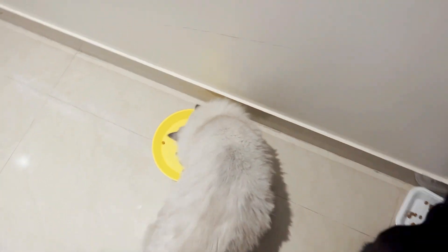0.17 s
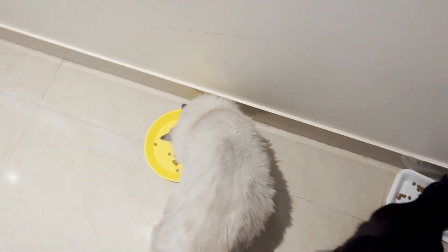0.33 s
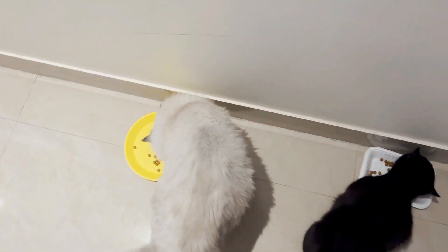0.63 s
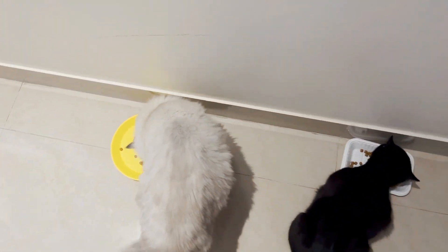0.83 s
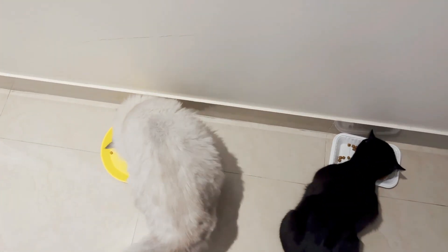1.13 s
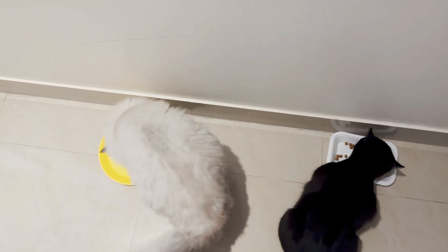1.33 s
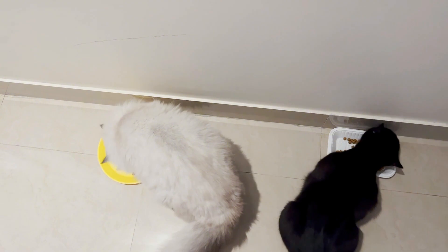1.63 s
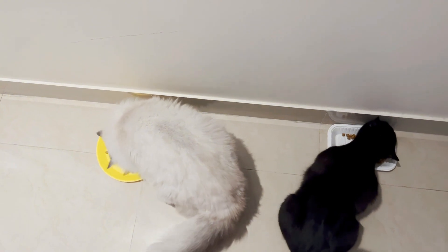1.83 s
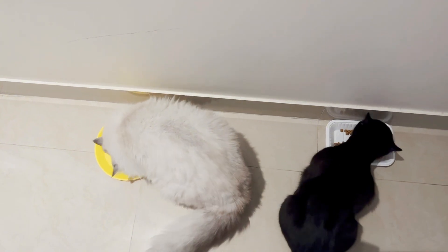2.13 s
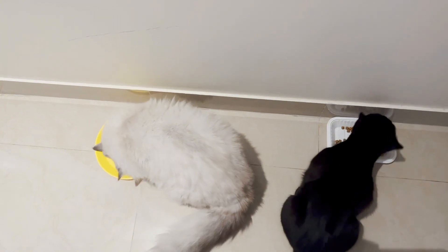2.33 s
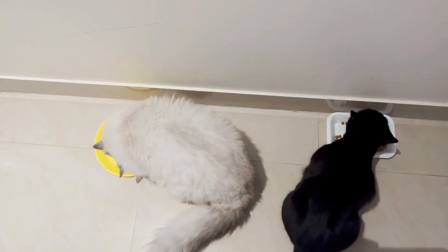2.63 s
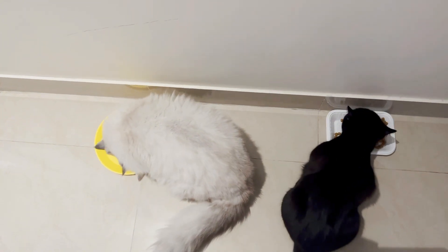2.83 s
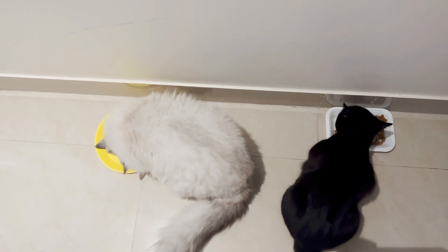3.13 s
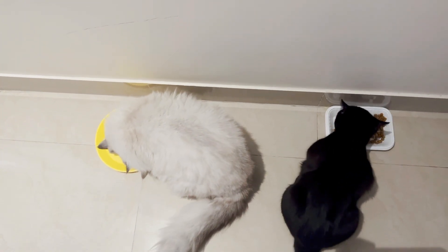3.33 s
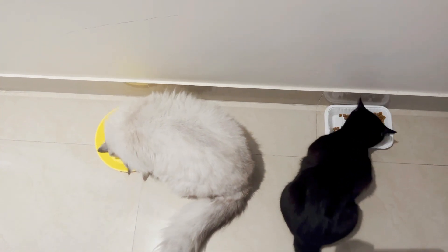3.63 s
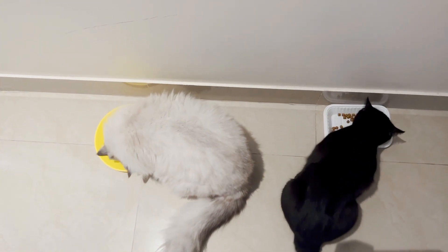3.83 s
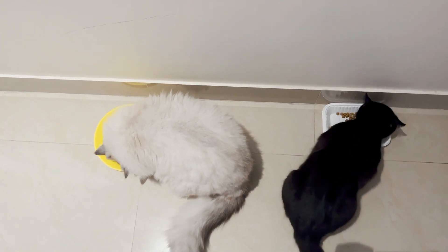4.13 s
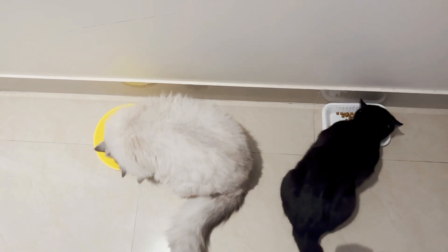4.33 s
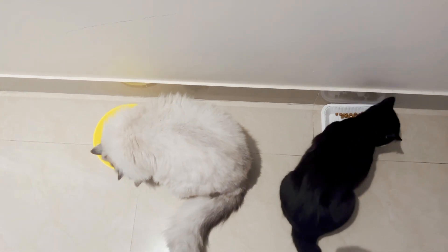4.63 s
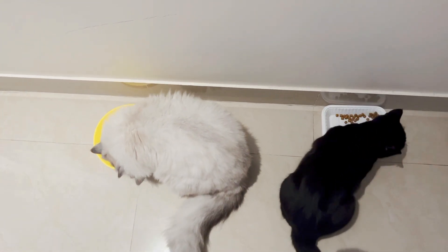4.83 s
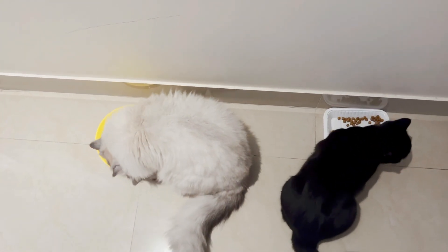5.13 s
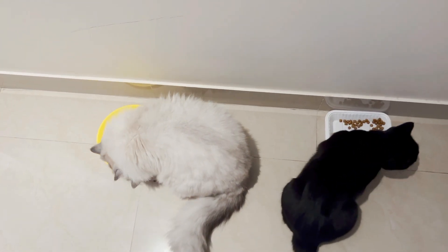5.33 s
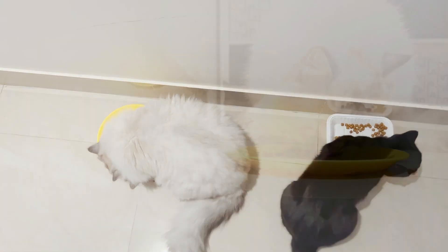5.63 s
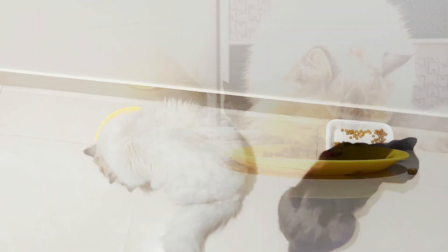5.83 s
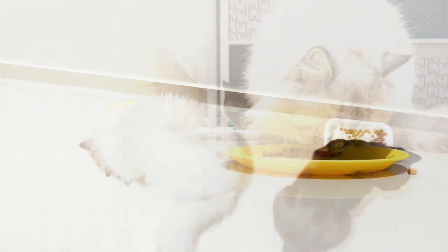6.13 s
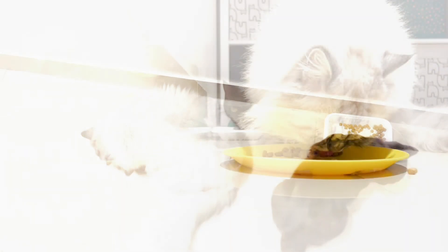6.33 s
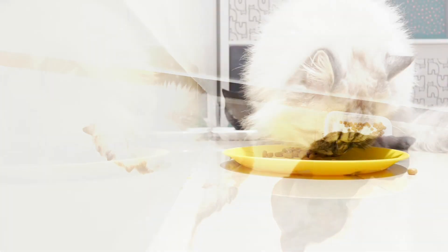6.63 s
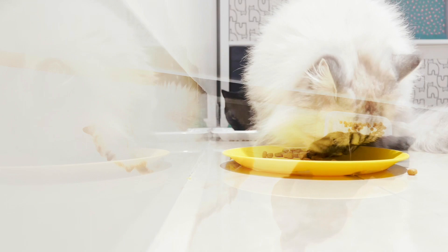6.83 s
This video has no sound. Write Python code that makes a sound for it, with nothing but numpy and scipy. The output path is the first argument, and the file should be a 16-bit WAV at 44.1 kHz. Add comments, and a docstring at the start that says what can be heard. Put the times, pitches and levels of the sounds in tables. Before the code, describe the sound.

Indoors on hard tiles, cats eat dry food from plastic dishes. Brittle cracks and gritty grinding open, then pellets tap the plate; after two seconds a quiet gap holds only faint wet mouth ticks. Crunching returns, ending with louder cracks, plate knocks and a growing rush of air. A low pulsing motor hum runs throughout. Close stereo microphone, slight room reflection.

```python
"""Teeth crack dry kibble and grind its crumbs: two cats eat from plastic dishes on tiles, beside a wall.
Cracks are short rings with noise splinters; grinding and sliding are grains over noise, shaped by strokes.
Pellets and dishes knock as decaying modes, with wet mouth ticks and faint falling ticks among them.
Dish, tiles and wall answer close to the two microphone ports, and the room answers the sharp sounds.
Behind, two motors beat in a low hum to the right, and the air rush grows louder near the end."""
import sys
import numpy as np
from scipy import signal
from scipy.fft import rfft, irfft
from scipy.io import wavfile

SR = 44100
rng = np.random.default_rng(int(sys.argv[2]) if len(sys.argv) > 2 else 0)


def log_audio(samples):
    """Write samples as a 16-bit WAV file to the path given in sys.argv[1]."""
    # one column per channel
    frames = np.atleast_2d(samples).T
    # limit to full scale, then quantise
    limited = np.clip(frames, -1, 1)
    pcm = np.round(limited * 32767).astype(np.int16)
    wavfile.write(sys.argv[1], SR, pcm)


N = 307818

# Pellets breaking between the teeth. Each row: start in seconds, relative peak in dB, ring in Hz, rise in s.
CRACKS = [(0.108, -40.5, 3560, .0005), (0.198, -40, 3900, .0006), (0.214, -37, 3860, .0007),
          (0.238, -31, 3460, 0.001), (0.3153, -43, 3950, 0.00053), (0.342, -31, 3970, 0.00034),
          (0.496, -35, 3660, .0006), (0.5391, -38.5, 3760, 0.00071), (0.5983, -26, 3970, 0.00043),
          (0.6264, -23, 3530, 0.00082), (0.6417, -35, 2580, 0.00057), (0.722, -52, 4060, .0005),
          (1.0987, -44.5, 2430, 0.00047), (1.33, -30, 2850, 0.00088), (1.331, -37, 2110, 0.00064),
          (1.3392, -40, 1680, .0006), (1.3485, -45, 2890, .0005), (1.374, -36, 4000, .0006),
          (1.3815, -33, 3520, 0.00064), (1.409, -36, 3666, .0004), (1.414, -41, 3870, .0005),
          (1.421, -41, 4100, 0.00045), (1.4283, -36, 3700, 0.0004), (1.5286, -35, 2500, 0.00041),
          (1.6624, -36, 3670, 0.00086), (1.685, -33, 1760, 0.00072), (1.687, -39, 3660, 0.00078),
          (1.7165, -39, 1600, .0006), (1.762, -37, 2700, 0.00056), (1.786, -44, 3900, .0005),
          (1.801, -38, 2550, 0.00077), (1.861, -42, 2300, 0.00055), (3.1735, -46, 2300, 0.00063),
          (3.2454, -48, 2310, .0007), (3.2798, -41, 2440, 0.0012), (3.6583, -39, 2340, 0.00035),
          (3.6715, -38, 2510, 0.00055), (3.8278, -44, 3730, 0.00046), (3.8446, -34.5, 2720, 0.00057),
          (3.913, -41, 2330, .0006), (3.931, -32, 2400, 0.0008), (3.947, -30, 2640, 0.00028),
          (3.955, -33, 2300, 0.00054), (3.9755, -32.5, 3164, 0.00051), (4.218, -33, 2650, 0.00049),
          (4.2677, -35, 3730, 0.00047), (4.2819, -37, 2830, .0005), (4.3493, -27, 3170, .0005),
          (4.397, -40, 3000, .0004), (4.6808, -30, 3150, 0.00077), (4.744, -46, 3060, 0.00043),
          (4.7577, -38, 2910, 0.00038), (4.8231, -29.5, 2600, 0.00062), (4.8249, -37, 3900, 0.0004),
          (4.8364, -50, 3110, 0.00041), (4.8514, -56, 2390, .0005), (4.9043, -48, 2510, 0.00052),
          (5.3668, -47.5, 2370, .0006), (5.3743, -46, 2350, 0.00084), (5.4117, -43, 3130, 0.00065),
          (5.4232, -39, 2600, 0.00049), (5.4577, -38, 3170, .0005), (5.4655, -40, 2420, 0.00053),
          (5.4978, -38, 2800, 0.00025), (5.5118, -34.5, 3530, 0.00055), (5.539, -42, 3300, 0.00059),
          (5.5707, -42, 3230, .0005), (5.5813, -36, 2970, 0.00041), (5.599, -49, 3460, .0005),
          (5.811, -32.5, 3170, 0.00041), (5.9469, -29.5, 2710, 0.00087), (6.0382, -38, 2900, 0.00053),
          (6.0417, -31, 2754, 0.00055), (6.0831, -31, 2480, 0.00032), (6.1224, -31.5, 3300, 0.00042),
          (6.132, -31, 2860, 0.001), (6.176, -33.5, 2830, 0.0005), (6.24, -21.5, 2900, 0.00062),
          (6.3159, -29, 2950, 0.00029), (6.6325, -48, 3600, .0006), (6.673, -38, 3650, 0.0007),
          (6.832, -36, 2880, 0.00035)]
# Jaw closing and grinding. Each row: start in seconds, length in s, relative level in dB, mouth resonance in Hz.
CHEWS = [(0.0, 0.19, -62.5, 3870), (0.193, 0.034, -57, 3930), (0.345, 0.021, -50, 3730),
         (0.391, 0.034, -54, 3170), (0.474, 0.03, -50.5, 3120), (0.641, 0.013, -51, 3126),
         (0.675, 0.021, -65, 2400), (0.715, 0.2, -68, 3380), (1.384, 0.02, -55, 3740),
         (1.41, 0.019, -52, 3900), (1.473, 0.029, -59.5, 3300), (1.514, 0.031, -54, 2880),
         (1.616, 0.059, -54.5, 3060), (1.692, 0.05, -56, 2000), (1.75, 0.062, -54, 2820),
         (1.845, 0.12, -62.5, 2340), (2.006, 0.033, -63, 2350), (3.188, 0.085, -77, 2320),
         (3.277, 0.012, -69.5, 2270), (3.564, 0.23, -69, 2350), (3.603, 0.098, -61, 2344),
         (3.841, 0.02, -54.5, 2690), (3.894, 0.027, -57.5, 2500), (3.929, 0.04, -46.5, 2880),
         (4.095, 0.12, -58, 3130), (4.214, 0.034, -50, 3135), (4.266, 0.019, -46, 3350),
         (4.338, 0.029, -60, 3100), (4.44, 0.073, -63.5, 2960), (4.735, 0.12, -64, 2930),
         (4.923, 0.062, -69, 3970), (5.373, 0.021, -60, 2660), (5.424, 0.018, -49, 3350),
         (5.455, 0.089, -54.5, 2900), (5.552, 0.028, -59, 2900), (5.595, 0.029, -69, 2780),
         (5.81, 0.023, -52, 3140), (5.9, 0.102, -62, 2900), (6.071, .008, -53, 2600),
         (6.124, 0.013, -50.5, 3200), (6.266, 0.12, -59, 3350), (6.384, 0.018, -55, 3340),
         (6.445, 0.0068, -59, 2280), (6.52, 0.0075, -55, 2270), (6.764, 0.0059, -54.5, 2210),
         (6.827, 0.17, -72, 2015)]
# Lesser fragments break at random within each chew; their peak is given above the chew's level.
FRAGMENTS_PER_S, FRAGMENT_DB, FRAGMENT_RISE_S = 45, 11, 0.0005
# Muzzle pushing loose pellets across the dish. Each row: start in seconds, length in s,
# relative level of the dish rustle in dB, relative level of the dry scraping in dB.
SHOVES = [(0.0, 0.37, -63.5, -69), (0.179, 0.067, -62, -62), (0.346, 0.024, -53.5, -57.5),
          (0.402, 0.15, -58, -61.5), (0.597, 0.004, -60, -54.5), (0.628, 0.022, -53.5, -54),
          (0.704, 0.17, -69, -77), (1.382, 0.069, -60.5, -60.5), (1.47, 0.064, -60.5, -63.5),
          (1.593, 0.081, -62.5, -63.5), (1.669, 0.11, -55, -66.5), (1.746, 0.06, -53, -62),
          (1.825, 0.1, -62, -72.5), (3.234, 0.82, -72, -100), (3.94, 0.086, -67, -66),
          (4.105, 0.16, -64, -69.5), (4.226, 0.081, -58.5, -64), (4.32, 0.04, -66, -72),
          (4.463, 0.043, -63, -74), (4.628, 0.076, -59.5, -72.5), (4.927, 0.06, -83, -79),
          (5.415, 0.13, -87, -69), (5.816, 0.043, -77, -64), (5.905, 0.21, -69, -70.5),
          (6.123, 0.025, -63, -65), (6.236, 0.046, -83, -58), (6.3, 0.096, -72, -64.5),
          (6.442, 0.014, -61, -56), (6.52, 0.014, -55, -62), (6.672, 0.03, -59, -53.5),
          (6.753, 0.18, -62, -87)]
# Colours of the three kinds of friction. Each row: frequency in Hz, density in dB per Hz.
GRIND = [(700, -10), (1300, 4), (1750, 0.5), (2150, 1.5), (2550, 3), (3300, -2.5), (4300, -1.5), (5300, -7),
         (6500, -13.5), (9000, -22)]
RUSTLE = [(100, -26), (180, 5.5), (300, 8.5), (500, -2), (850, 7.5), (1400, -0.5), (1900, 1.5), (3000, -45)]
SCRAPE = [(3500, -4), (5500, 0.5), (7000, 0.5), (8500, -4), (9300, -31), (10200, -22), (11000, -3),
          (12300, -4), (13500, -6.5), (14500, -21), (15500, -21)]
# A stroke swells (the jaw slowly, a shove faster, a jolt at once), sags, stops, and lingers faintly.
CHEW_SWELL_DB_PER_S, SHOVE_SWELL_DB_PER_S, JOLT_SWELL_DB_PER_S = 604, 1000, 5002
SAG_DB_PER_S, RELEASE_DB_PER_S = 6.5, 411
LINGER_DB, LINGER_DB_PER_S = -6.5, 133
# A tapped pellet jostles its neighbours: length of the jolt, and levels against the tap.
JOSTLE_S, JOSTLE_GRIND_DB, JOSTLE_SCRAPE_DB, JOSTLE_RUSTLE_DB = 0.0049, -26.5, -30.5, -29
# Pellets knocking on the plate. Each row: start in seconds, relative peak in dB,
# relative brightness in dB, upper edge of the ring in Hz.
TAPS = [(0.288, -37, -11, 5400), (0.517, -32, -24, 5500), (0.8966, -36.5, -22, 5400),
        (0.903, -37, -30, 4520), (0.9464, -35, -31, 4600), (0.961, -38, -31, 4800),
        (0.9905, -36, -31, 5850), (0.995, -48.5, -30, 4000), (1.753, -38.5, -19, 4990),
        (2.078, -34.5, -32, 3640), (2.0815, -39, -35, 2900), (2.15, -37.5, -40, 5160),
        (4.1065, -34, -33, 4500), (4.6276, -33, -29, 3640), (4.6808, -38.5, -27, 6400),
        (4.9348, -42.5, -18, 5500), (6.056, -34, 18, 5500), (6.443, -35, -8, 6500), (6.448, -32, -15, 6480),
        (6.456, -34, -19, 6000), (6.528, -38, 15, 5500), (6.618, -27, -7, 4770), (6.6599, -21.5, -18, 5130),
        (6.6621, -30, -10, 5000), (6.69, -41, -4, 5460), (6.832, -47, -43, 5950), (6.882, -49, -32, 5500)]
# Bright modes of plate and pellet. Each row: nominal frequency in Hz, mean level in dB, 60 dB decay in s.
PLATE = [(1023, -12.5, 0.02), (1600, -21, 0.036), (2400, -1, 0.013), (2970, -39, 0.014),
         (3480, 5.5, 0.0086), (3670, -24, 0.03), (4820, 4.5, 0.021), (5240, -17.5, 0.079),
         (7330, 4.5, .016), (8700, -15, 0.0098), (12200, 12, 0.011), (13900, -19, .006)]
# Dish knocked against the tiles. Each row: start in seconds, relative thud in dB,
# relative rim ring in dB, nominal pitch of the rim in Hz.
KNOCKS = [(0.636, -60, -54, 1560), (1.758, -48, -61, 1570), (4.245, -41, -45, 1500), (4.29, -49, -51, 1510),
          (6.448, -52, -48, 2210), (6.457, -58, -42.5, 2060), (6.518, -43, -47, 1546),
          (6.529, -49, -45, 1570), (6.6189, -41.5, -38.5, 1550), (6.661, -44, -38, 1620),
          (6.689, -44, -51, 1550), (6.765, -53, -48, 1550), (6.77, -47, -45, 1580),
          (6.8315, -57, -47, 1136), (6.576, -46, -60, 1550), (6.752, -50, -62, 1550),
          (6.803, -52, -66, 1550), (6.88, -49, -62, 1130), (6.935, -51, -62, 1130)]
# Low modes of the dish. Each row: nominal frequency in Hz, mean level in dB, 60 dB decay in s.
PLATE_BODY = [(327, 10, 0.016), (490, 4.5, 0.018), (786, -3, 0.035), (1013, -12.5, 0.05)]
# Modes of the rim. Each row: multiple of the rim's pitch, mean level in dB, 60 dB decay in s.
RIM = [(1, -4.5, 0.045), (1.2, -5, 0.042), (1.375, -0.5, 0.041), (1.72, -14, .03)]
# Narrow resonances of the dish. Each row: frequency in Hz, width in Hz, level in dB.
DISH_RING = [(1050, 26, -1.5), (1260, 42, -8.5), (1510, 27, -9), (1766, 40, 1), (2190, 17, -4),
             (2490, 42, -12), (3284, 50, 1), (3580, 14, -12), (4560, 30, -2), (5060, 12, -4),
             (5300, 36, -12), (5700, 25, -12)]
# Small wet mouth ticks. Each row: middle of the rise in seconds, relative level in dB, ring in Hz,
# rise in s, sharpness (no unit).
SMACKS = [(1.295, -59.5, 2750, 0.0031, 7), (2.295, -67, 4340, .0025, 5), (2.325, -63, 3423, 0.0026, 4),
          (2.344, -59, 2560, .003, 6), (2.432, -70, 4500, .005, 25), (2.602, -72, 3200, .003, 15),
          (2.604, -73, 5300, .003, 25), (2.656, -68, 4450, 0.0081, 26), (2.778, -72.5, 5900, 0.0086, 6.6),
          (2.786, -68.5, 3580, 0.0039, 6.8), (2.864, -70, 2675, 0.0064, 9), (2.884, -71, 6100, 0.0037, 7),
          (3.179, -66, 5800, .0025, 8.9), (3.253, -68, 4650, 0.0025, 25), (3.44, -58, 2470, 0.0018, 8),
          (3.547, -53.5, 2570, .003, 10), (3.761, -54, 3350, .003, 6.3), (4.566, -55, 3080, 0.0037, 5),
          (4.932, -50.5, 3880, 0.0038, 9), (5.782, -45, 2670, 0.0029, 4)]
# Faint ticks that fall in pitch. Each row: start in seconds, relative peak in dB.
FALLING_TICKS = [(5.465, -50.5), (5.522, -50), (5.555, -57), (5.585, -51), (5.622, -57), (5.645, -56),
                 (5.669, -54.5), (5.708, -59), (5.724, -59), (5.744, -54.5), (5.767, -57), (5.792, -55),
                 (5.831, -57), (5.879, -56), (5.911, -57.5), (6.209, -54.5), (6.308, -49)]
# Reflections of the chewing off dish rim, tiles and wall. Each row: left delay in s, right delay in s, level in dB.
NEAR_ECHOES = [(.0017, 0.0016, -34), (.0031, .0026, -29), (.0052, 0.0053, -13), (.0083, 0.01, -8.5)]
# Stereo likeness of the friction at the dishes. Each row: frequency in Hz, left-right likeness (no unit).
NEAR_LIKENESS = [(150, 0.53), (1200, 0.18), (3000, 0.53), (8000, 0.083)]
# Direction of each bout of eating. Each row: start in seconds, lag of the left port in s, left over right in dB.
BEARING = [(0, .0005, 0.5), (1.2, .00018, 1), (3.0, .00002, 2), (4.08, .00049, 1), (5.2, .00002, 3),
           (6.43, -.00011, .5)]
ROOM_T60_S, WALL_CUT_HZ = 0.42, 8400
# Hum of two motors almost in step. Each row: time in seconds, level in dB, beats per second.
HUM = [(0, -52.5, 1.4), (1.3, -55.5, 1.71), (2.1, -57, 1.27), (2.9, -53, 1.72), (3.7, -46.5, 1.92),
       (4.9, -50, 1.76), (5.7, -54.5, 1.63), (6.35, -50, 1.5), (6.5, -47.5, 1.18), (6.98, -50, 1)]
HUM_HZ, SECOND_MOTOR_DB, FIRST_LULL_S = 57.04, -5.5, 0.29
# Steady machine tones. Each row: nominal frequency in Hz, relative level in dB.
TONES = [(42.6, -56.5), (72, -67), (93, -68), (115.5, -68.5), (120, -70.5), (146, -73), (173, -73.5),
         (280, -79.5), (360, -79)]
# Colours of the room air and of the rush. Each row: frequency in Hz, density in dB per Hz.
AIR = [(22, -13), (33, -0.5), (60, 1.5), (90, -1), (130, -8), (220, -6.5), (350, -13), (500, -16.5),
       (850, -20.5), (1400, -23), (2000, -27.5), (2800, -38.5), (4200, -46), (7000, -44.5), (9000, -57.5),
       (9900, -61), (11000, -51), (12500, -43), (16000, -60)]
RUSH = [(22, -12), (40, -18), (80, 3), (130, 0.5), (280, -1), (450, -12), (700, -11.5), (1200, -14.5),
        (2200, -37), (4500, -40), (16000, -63)]
# Background levels. Each row: time in seconds, room air in dB, rush in dB, machine tones in dB.
AIR_LEVEL = [(0, -55, -82, 0.5), (2.2, -57, -78, 0.5), (5.42, -57, -86, 1), (5.5, -56, -80, 2),
             (5.62, -62.5, -78, -1), (5.76, -54, -66, 2), (5.88, -57.5, -71, 4), (6.425, -58.5, -61, 7),
             (6.45, -73, -52, 5.5), (6.98, -62, -52, 6.5)]
# Stereo likeness of air and rush. Each row: frequency in Hz, left-right likeness (no unit).
LIKENESS = [(50, 0.6), (130, 0.82), (280, 0.87), (550, 0.68), (1200, 0.18), (3000, 0.0055), (5000, 0.44),
            (8000, 0.12), (12500, 0.92)]
CUTOFF_HZ = 16000


def from_db(db):
    """Decibels become an amplitude factor."""
    return 10 ** (np.asarray(db) / 20)


def rms_one(x):
    """Scale a sound to an rms of 1."""
    return x / np.sqrt(np.mean(x ** 2) + 1e-20)


def balance(db):
    """Gains that set the left port above the right by so many dB."""
    return from_db(db * np.array([[.5], [-.5]]))


def in_time(rows):
    """Each column of a curve at every sample."""
    s, *columns = np.transpose(rows)
    return [np.interp(np.arange(N) / SR, s, c) for c in columns]


def at_hz(points, hz):
    """A spectrum read on a log-frequency axis."""
    f, value = np.transpose(points)
    return np.interp(np.log(np.maximum(hz, 1)), np.log(f), value)


def drift(rate):
    """Random wander of rms 1, with so many turning points per second."""
    points = rng.standard_normal(int(rate * N / SR) + 3)
    return rms_one(np.interp(np.arange(N) / SR * rate, np.arange(len(points)), points))


def add(out, s, sound):
    """Mix a sound in from time s."""
    at = max(int(s * SR), 0)
    out[..., at:at + sound.shape[-1]] += sound[..., :max(N - at, 0)]


def coloured(pair, spectrum, likeness):
    """Two unrelated signals become a stereo field of the given colour; rms 1."""
    hz = np.fft.rfftfreq(N, 1 / SR)
    mid, side = rfft(pair) * from_db(at_hz(spectrum, hz))
    alike = np.clip(at_hz(likeness, hz), -1, 1)
    return rms_one(irfft(np.sqrt(1 + alike) * mid + np.sqrt(1 - alike) * side * [[1], [-1]], N))


def cracks(pan_db=4.5, overtone=1.337, overtone_db=-9, splinter_db=-19.0, splinter_s=0.011,
           wall_s=0.0024, wall_db=-15, level_db=-4.5):
    """A break rings for a few cycles; splinters follow, and the wall throws the snap back."""
    out, t = np.zeros((2, N)), np.arange(SR // 25) / SR
    band = signal.butter(3, [1500, 5300], "band", fs=SR, output="sos")
    for s, db, hz, rise_s in CRACKS + fragments():
        swell = (t / rise_s) ** 2 * np.exp(2 * (1 - t / rise_s))
        phase = 2 * np.pi * rng.random(2)
        ring = np.sin(2 * np.pi * hz * t + phase[0])
        ring += from_db(overtone_db) * np.sin(2 * np.pi * hz * overtone * t + phase[1])
        noise = rng.standard_normal((2, len(t)))
        splinters = rms_one(signal.lfilter(*signal.iirpeak(hz, 2.5, fs=SR), noise))
        splinters = from_db(splinter_db) * splinters * np.exp(-t / splinter_s)
        snap = signal.sosfilt(band, swell * ring + splinters)
        snap = from_db(db + level_db) * balance(pan_db) * snap / np.abs(snap).max()
        add(out, s, snap)
        add(out, s + wall_s, from_db(wall_db) * snap[::-1])  # the echo swaps sides
    return out


def fragments(pitch_spread=0.23):
    """Small cracks scattered through the chews, as (s, relative peak dB, ring Hz, rise s)."""
    rows = []
    for s, length, db, hz in CHEWS:
        waits = np.cumsum(rng.exponential(1, size=16)) / FRAGMENTS_PER_S
        for wait, high in zip(waits, rng.standard_normal(16)):
            if wait < length:
                ring_hz = hz * np.exp(pitch_spread * high)
                rows.append((s + wait, db + FRAGMENT_DB, ring_hz, FRAGMENT_RISE_S))
    return rows


def eating(crumbs_s=0.0016, crumbs_db=-30, grind_pan_db=-1.6, level_db=-2):
    """Chews and cracks grind crumbs; shoved and jostled pellets rustle in the dish and scrape."""
    chews = [(s, length, db) for s, length, db, _ in CHEWS]
    crumbs = [(s, crumbs_s, db + crumbs_db) for s, db, _, _ in CRACKS]
    rustles = [(s, length, db) for s, length, db, _ in SHOVES]
    scrapes = [(s, length, db) for s, length, _, db in SHOVES]
    grind_power = strokes(chews, CHEW_SWELL_DB_PER_S) + strokes(crumbs, JOLT_SWELL_DB_PER_S)
    grind_power += jostles(JOSTLE_GRIND_DB)
    rustle_power = strokes(rustles, SHOVE_SWELL_DB_PER_S) + jostles(JOSTLE_RUSTLE_DB)
    scrape_power = strokes(scrapes, SHOVE_SWELL_DB_PER_S) + jostles(JOSTLE_SCRAPE_DB)
    grind = np.sqrt(grind_power) * grinding() * balance(grind_pan_db)
    rustle = np.sqrt(rustle_power) * friction(RUSTLE, per_s=700, spread_db=3.0, grain_db=5.5, clump_db=2.0)
    scrape = np.sqrt(scrape_power) * friction(SCRAPE, per_s=900, spread_db=3.5, grain_db=-4.0, clump_db=1.5)
    return near_echoes(from_db(level_db) * dish(rustle + grind + scrape))


def grinding(per_s=170, spread_db=3.0, grain_db=-0.5, uneven_db=6, patch_db=1.3, clump_db=2.0,
             focus_db=7.5, skirt_db=-22):
    """Each crumb snaps across all bands with its own colour; the mouth favours those near its resonance."""
    edges = np.geomspace(1150, 7000, 8)
    mouth_hz = mouth_resonance()
    wash = rng.standard_normal((2, 2, N))
    count = int(per_s * N / SR)
    at = rng.integers(0, N, count)
    sizes = from_db(spread_db * np.minimum(rng.exponential(1, count), 3.5))
    sizes = sizes * rng.choice([-1, 1], (2, count))
    out, power = 0, 0
    for k, (low, high) in enumerate(zip(edges, edges[1:])):
        hz, grains = np.sqrt(low * high), np.zeros((2, N))
        grains[:, at] = sizes * from_db(uneven_db * rng.uniform(-0.91, 1, sizes.shape))
        crumbs = (-1) ** k * from_db(grain_db) * rms_one(grains) + wash[k % 2]
        band = signal.sosfilt(signal.butter(2, [low, high], "band", fs=SR, output="sos"), crumbs)
        octaves_off = np.log2(hz / mouth_hz)
        weight = from_db(np.maximum(-focus_db * octaves_off ** 2, skirt_db))
        out = out + band * weight * from_db(patch_db * drift(45))
        power = power + weight ** 2 * from_db(at_hz(GRIND, hz)) ** 2 * (high - low)
    # an even level, wherever the resonance lies
    return coloured(out / np.sqrt(power) * from_db(clump_db * drift(90)), GRIND, NEAR_LIKENESS)


def mouth_resonance():
    """The resonance glides from chew to chew as jaw and head move."""
    return in_time([(s + length / 2, hz) for s, length, _, hz in CHEWS])[0]


def friction(spectrum, per_s, spread_db, grain_db, clump_db):
    """Tiny fractures of uneven size come in clumps, over the wash of their own reflections."""
    sizes = from_db(spread_db * np.minimum(rng.exponential(1, N), 3.5))
    grains = rms_one((rng.random(N) < per_s / SR) * sizes * rng.standard_normal((2, N)))
    clumps = from_db(clump_db * drift(90))
    wash = rng.standard_normal((2, N))
    return coloured(clumps * (from_db(grain_db) * grains + wash), spectrum, NEAR_LIKENESS)


def strokes(rows, swell_db_per_s):
    """Power over time of strokes given as (s, length s, level dB), summed where they overlap."""
    power, t = np.zeros(N), np.arange(-SR // 10, SR) / SR  # the swell comes ahead of the start
    for s, length, db in rows:
        after = np.maximum(t - length, 0)
        held = db + swell_db_per_s * np.minimum(t, 0) - SAG_DB_PER_S * np.clip(t, 0, length)
        fading = np.maximum(-RELEASE_DB_PER_S * after, LINGER_DB - LINGER_DB_PER_S * after)
        add(power, s + t[0], (from_db(held + fading) ** 2)[s + t >= 0])
    return power


def jostles(offset_db):
    """Each tap sets off a brief stroke among the pellets around it."""
    return strokes([(s, JOSTLE_S, db + offset_db) for s, db, _, _ in TAPS], JOLT_SWELL_DB_PER_S)


def taps(contact_s=0.0018, ring_db=-11, shell_hz=5500, bright_db=5, side_db=-7, detune=.03, level_db=-2.5):
    """A hard contact clicks and sets the plate's modes ringing, each with a strength of its own."""
    out, t = np.zeros((2, N)), np.arange(SR // 8) / SR
    hz, mode_db, t60 = np.transpose(PLATE)[:, :, None]
    sharp = signal.butter(4, shell_hz, "high", fs=SR, output="sos")
    thin = signal.butter(2, 1300, "high", fs=SR, output="sos")
    for s, db, brightness_db, edge_hz in TAPS:
        dull = signal.butter(4, edge_hz, fs=SR, output="sos")
        strength = from_db(mode_db + rng.normal(0, 1.0, (2, len(PLATE), 1)) - 60 * t / t60)
        phase = 2 * np.pi * rng.random((2, len(PLATE), 1))
        detuned_hz = hz * rng.normal(1, detune, hz.shape)
        modes = (strength * np.sin(2 * np.pi * detuned_hz * t + phase)).sum(1)
        contact = rng.standard_normal((2, len(t))) * np.exp(-t / contact_s)
        click = signal.sosfilt(thin, contact + from_db(ring_db) * modes)
        click = signal.sosfilt(dull, click) + from_db(brightness_db + bright_db) * signal.sosfilt(sharp, click)
        click = click[0] + from_db(side_db) * click[1] * [[1], [-1]]  # middle and sides
        add(out, s, from_db(db + level_db) * click / np.abs(click).max(1).mean())
    return out


def knocks(thud_level_db=-8, rim_level_db=-2):
    """The dish flexes against the tiles with a brief thud, and its rim rings on."""
    out = np.zeros((2, N))
    body = np.transpose(PLATE_BODY)[:, :, None]
    multiple, mode_db, t60 = np.transpose(RIM)[:, :, None]
    for s, thud_db, rim_db, rim_hz in KNOCKS:
        add(out, s, from_db(thud_db + thud_level_db) * struck(*body))
        add(out, s, from_db(rim_db + rim_level_db) * struck(multiple * rim_hz, mode_db, t60))
    return out


def struck(hz, mode_db, t60):
    """Decaying modes, whose strength in each port and slight detuning differ from blow to blow."""
    t = np.arange(SR // 12) / SR
    strength = from_db(mode_db + rng.normal(0, 1.7, (2, len(hz), 1)) - 60 * t / t60)
    strength = strength * rng.choice([-1, 1], hz.shape)
    detuned_hz = hz * rng.normal(1, 0.01, hz.shape)
    return (strength * np.sin(2 * np.pi * detuned_hz * t)).sum(1)


def dish(x):
    """Whatever rubs or strikes the dish sets its narrow resonances singing."""
    out = x
    for hz, width, db in DISH_RING:
        resonance = signal.iirpeak(hz, hz / width, fs=SR)
        out = out + from_db(db) * signal.lfilter(*resonance, x + 1e-18)
    return out


def smacks(level_db=-7):
    """Tongue and lips part with a short narrow ring."""
    out, t = np.zeros((2, N)), np.arange(SR // 25) / SR
    for s, db, hz, rise_s, sharpness in SMACKS:
        edges_hz = hz * (1 + np.array([-1, 1]) / sharpness)
        band = signal.butter(2, edges_hz, "band", fs=SR, output="sos")
        ring = rms_one(signal.sosfilt(band, rng.standard_normal((2, len(t)))))
        swell = t / rise_s * np.exp(1 - t / rise_s)
        add(out, s - rise_s / 2, from_db(db + level_db) * ring * swell)
    return out


def falling_ticks(start_hz=3200, end_hz=255, glide_s=0.001492, length_s=0.015, level_db=-2.5):
    """Each tick slides from treble to bass within a few milliseconds, alike in both ports."""
    out, t = np.zeros((2, N)), np.arange(SR // 40) / SR
    hz = end_hz + (start_hz - end_hz) * np.exp(-t / glide_s)
    tick = np.sin(2 * np.pi * np.cumsum(hz) / SR) * np.exp(-t / length_s)
    for s, db in FALLING_TICKS:
        add(out, s, from_db(db + level_db) * tick)
    return out


def near_echoes(x):
    """Close surfaces comb the sound with short echoes."""
    out = x.copy()
    for left_s, right_s, db in NEAR_ECHOES:
        add(out[0], left_s, from_db(db) * x[0])
        add(out[1], right_s, from_db(db) * x[1])
    return out


def placed(x):
    """Each bout of eating reaches the two microphone ports with the lag and balance of its direction."""
    s, lag_s, pan_db = np.transpose(BEARING)
    n = np.arange(N)
    bout = np.searchsorted(s[1:], n / SR)
    lag = np.round(lag_s[bout] * SR).astype(int)
    left = x[0, np.clip(n - lag, 0, N - 1)]
    return np.array([left, x[1]]) * balance(pan_db[bout])


def room(x):
    """Tile and plaster: eight feedback delays a side, duller on every round, then smeared."""
    out, dull = np.zeros((2, N)), np.exp(-2 * np.pi * WALL_CUT_HZ / SR)
    lags = (rng.uniform(.005, .04, 16) * SR).astype(int)
    for k, lag in enumerate(lags):
        loop, gain, state = x[k % 2].copy(), from_db(-60 * lag / SR / ROOM_T60_S), [0.]
        for i in range(lag, N, lag):
            last_round = loop[i - lag:i] + 1e-18
            back, state = signal.lfilter([gain * (1 - dull)], [1, -dull], last_round, zi=state)
            loop[i:i + lag] += back[:N - i]
        out[k % 2] += (loop - x[k % 2]) * (-1) ** (k // 2)
    scatter = rng.standard_normal((2, SR // 50)) * np.linspace(1, 0, SR // 50)
    scatter /= np.sqrt((scatter ** 2).sum(1, keepdims=True))
    return signal.fftconvolve(out, scatter, axes=1)[:, :N]


def background(waver_hz=0.25, lumps_db=2.5):
    """Machines hum, two deep tones beating against each other; air rushes around them."""
    def turning(hz):
        """Phase of a tone whose pitch wavers slightly."""
        return 2 * np.pi * np.cumsum(hz + waver_hz * drift(1.915)) / SR
    air_db, rush_db, tones_db = in_time(AIR_LEVEL)
    hum_db, beat_hz = in_time(HUM)
    slip = 2 * np.pi * (np.cumsum(beat_hz) / SR - beat_hz[0] * FIRST_LULL_S)
    motor = turning(HUM_HZ)
    hum = from_db(hum_db) * (np.sin(motor) - from_db(SECOND_MOTOR_DB) * np.sin(motor - slip))
    tones = sum(from_db(db) * np.sin(turning(hz)) for hz, db in TONES)
    hum = hum + from_db(tones_db) * tones
    air = from_db(air_db) * coloured(rng.standard_normal((2, N)), AIR, LIKENESS)
    rush = from_db(rush_db + lumps_db * drift(40)) * coloured(rng.standard_normal((2, N)), RUSH, LIKENESS)
    left, right = np.sqrt(2) * hum + air + rush
    # it all comes from the right, so the left port hears it a quarter of a millisecond later
    return np.array([np.pad(left, (11, 0), mode="reflect")[:N], right])


def scene():
    """Sharp sounds echo in the room, over the chewing and the hum."""
    hits = cracks() + dish(taps()) + knocks() + smacks()
    at_the_dishes = placed(hits + eating())
    return at_the_dishes + from_db(-19.0) * room(hits) + falling_ticks() + background()


def record(dry, top_hz=16500):
    """The microphone dulls the very top, which is then cut."""
    dulled = signal.sosfilt(signal.butter(3, min(top_hz, .44 * SR), fs=SR, output="sos"), dry)
    return signal.sosfilt(signal.ellip(10, .2, 80, CUTOFF_HZ, fs=SR, output="sos"), dulled)


dry = scene()
out = record(dry)
log_audio(out)
```